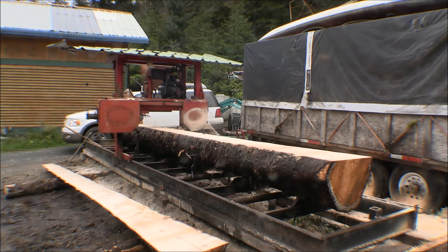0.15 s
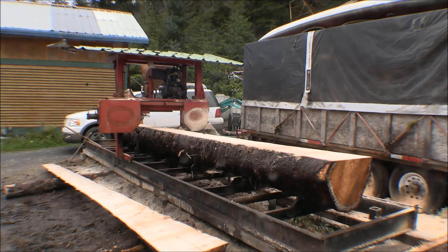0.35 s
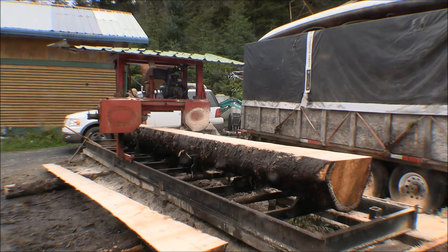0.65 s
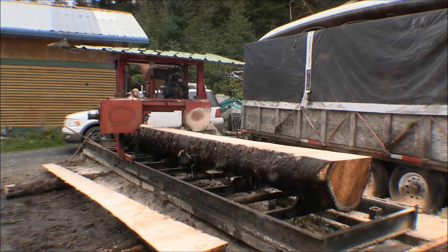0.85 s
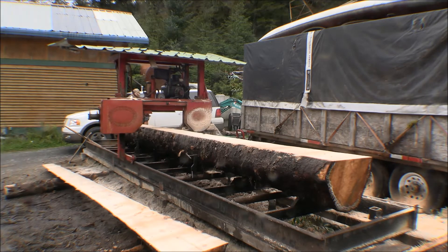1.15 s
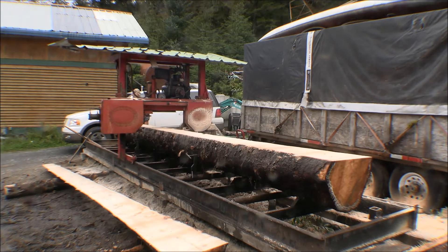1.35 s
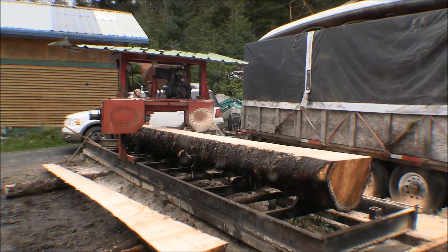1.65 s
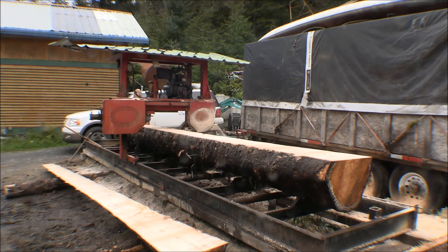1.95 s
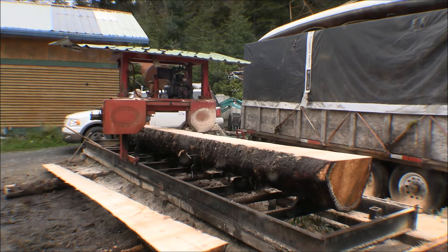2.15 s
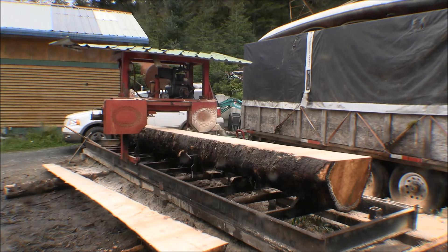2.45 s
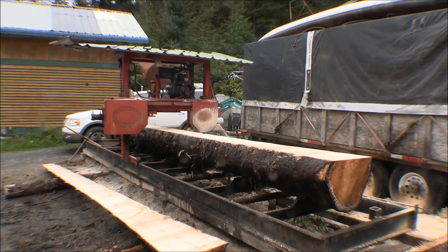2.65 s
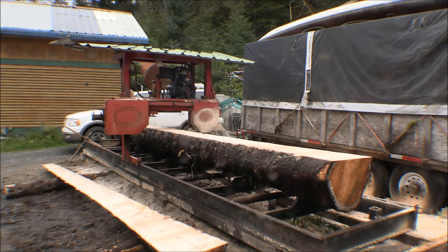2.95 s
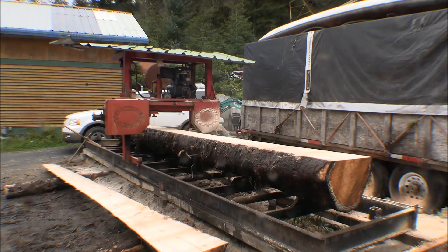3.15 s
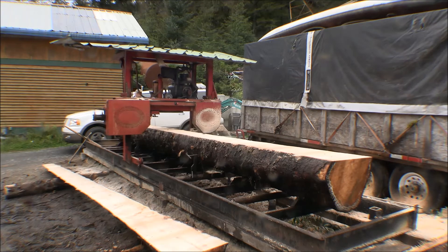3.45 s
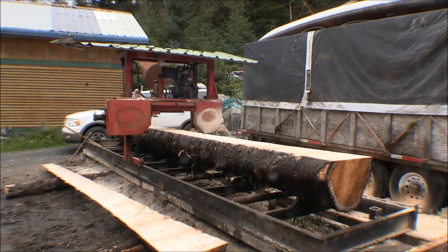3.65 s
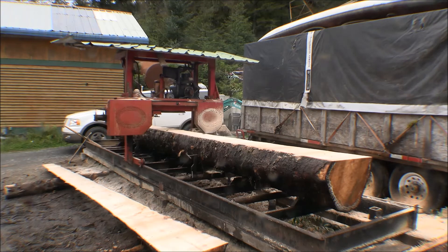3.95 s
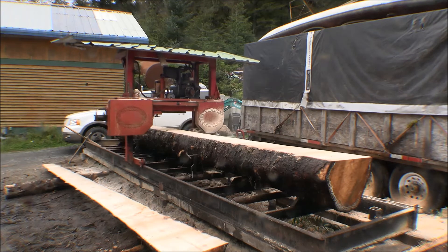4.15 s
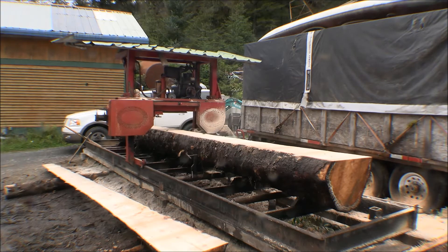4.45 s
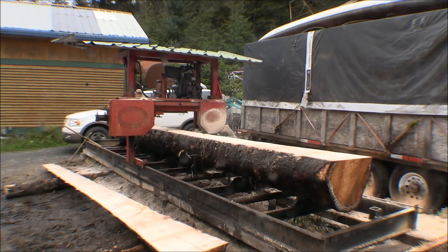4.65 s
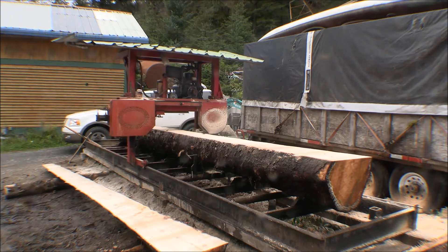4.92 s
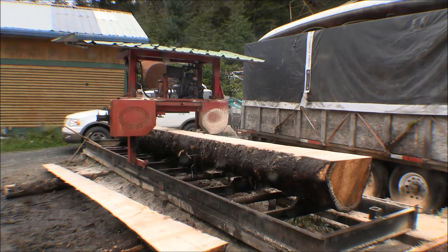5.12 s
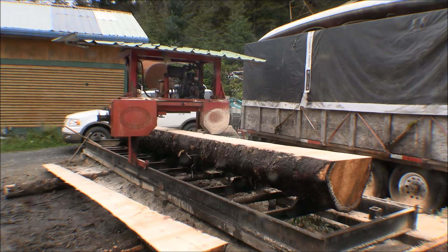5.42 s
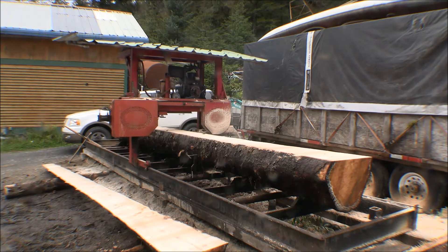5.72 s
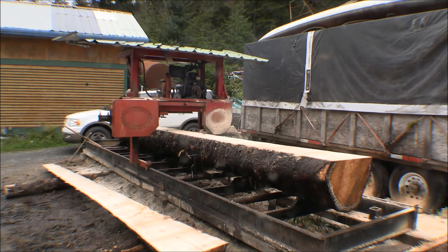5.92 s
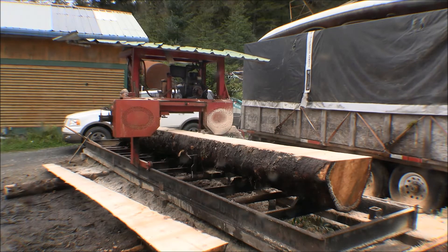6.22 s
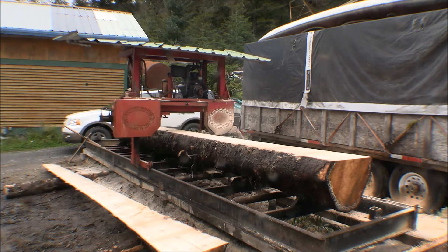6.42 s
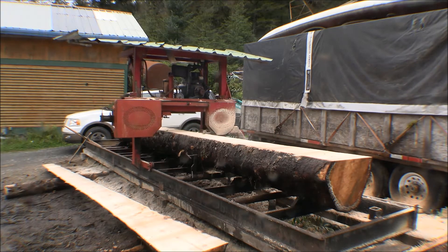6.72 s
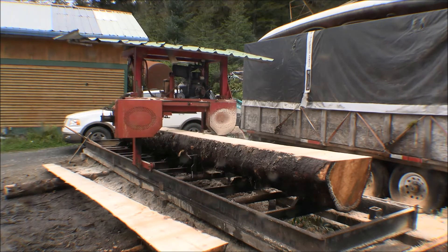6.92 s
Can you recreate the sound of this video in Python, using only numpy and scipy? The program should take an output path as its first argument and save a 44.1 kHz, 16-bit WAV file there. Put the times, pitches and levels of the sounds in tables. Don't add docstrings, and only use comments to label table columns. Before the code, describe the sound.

A portable band sawmill cuts lengthwise through a log in an open yard, already running at full load at 0 s and continuing unbroken to about 7 s. The engine holds a steady, buzzing drone, rich in harmonics, with tiny flutters and rapid stroke pulses. Over it lies a dense, bright roar and the sizzling hiss of the blade in wood, with metallic ringing from guards and blade. A sharp squeak comes at 0.06 s, a softer one at 0.2 s, then small chirps at 0.36 to 0.5 s. A faint fan tone sinks and vanishes by about 1.5 s. A thin roller whine near 2 kHz wavers throughout, dipping around 3 s and strengthening near 3.5 s. Faint chips occur around 3.8, 4.4, 5.5 and 6 s. The carriage creeps nearer, subtly changing tone and trailer echo; small stereo microphone, no ending.

```python
import sys
import numpy as np
from scipy import signal
from scipy.io import wavfile
from scipy.ndimage import uniform_filter1d

SR = 44100
rng = np.random.default_rng(int(sys.argv[2]) if len(sys.argv) > 2 else 0)


def volts_from_db(level):
    exponent = np.asarray(level, float) / 20
    return 10 ** exponent


def digitize_waveform(pressure):
    field = np.atleast_2d(pressure).T
    bounded = np.clip(field, -1, 1)
    quanta = np.round(bounded * 32767).astype(np.int16)
    wavfile.write(sys.argv[1], SR, quanta)


N = 312228
STEP = 200

# time in seconds, shaft speed in Hz.
SHAFT_SPEED = [(0, 107.65), (.45, 107.81), (1.2, 107.58), (1.65, 107.72), (2.0, 107.64), (2.5, 107.73),
               (2.97, 107.43), (3.5, 107.81), (3.85, 107.71), (4.25, 107.83), (4.7, 107.57), (5.05, 107.72),
               (5.55, 107.58), (6.0, 107.71), (7.08, 107.63)]
# multiple of shaft speed, rms level far in dB, rms level near in dB,
# echo share 0-1, moment in seconds when the echo adds fully.
LOW_ORDERS = [(2, -57.5, -57.3, 0, 0), (4, -40.7, -45.7, 0.15, 0.0), (5, -56.8, -62.3, 0.6, 6.9),
              (6, -37.0, -44.2, 0.45, 9.3), (7, -64.2, -60.3, 0.75, 6.7), (8, -52.1, -51.6, 0.75, 5.3),
              (9, -54.2, -46.7, 0.15, 1.0), (10, -44.9, -48.7, 0.45, 4.2), (11, -49.3, -44.9, 0.15, 2.2),
              (12, -44.1, -44.3, 0.3, 0.7), (13, -53.9, -55.2, 0, 0.0), (14, -37.2, -42.9, 0.3, 3.3),
              (15, -44.0, -54.4, 0.15, 2.5), (16, -42.8, -42.0, 0.15, 1.8), (17, -55.3, -56.1, 0.15, 1.7),
              (18, -36.8, -39.4, 0, 0.0), (19, -53.4, -56.4, 0.15, 0.2), (20, -55.4, -47.8, 0.45, 2.1),
              (21, -63.6, -55.8, 0.6, 1.3), (22, -64.2, -51.8, 0.15, 1.6)]
# multiple of shaft speed, rms level far in dB, rms level near in dB.
HIGH_ORDERS = [(23, -53.6, -55.7), (24, -50.8, -49.7), (25, -58.7, -45.2), (26, -46.7, -44.5),
               (27, -56.7, -47.4), (28, -39.5, -39.5), (29, -61.3, -56.2), (30, -43.5, -44.2),
               (31, -54.7, -56.4), (32, -51.4, -47.1), (33, -60.6, -56.0), (34, -50.1, -43.9),
               (35, -64.9, -58.6), (36, -60.9, -55.1), (37, -60.5, -56.0), (38, -54, -47.5),
               (39, -63.8, -52.1), (41, -62.6, -57.1), (42, -62.6, -53.0), (44, -67.4, -55.6),
               (46, -59.6, -54.8), (48, -56.2, -63.7), (49, -52, -52.5), (50, -62, -46), (52, -61.0, -59.1),
               (56, -56.8, -61.4), (57, -43.5, -58)]
SIDEWAYS_ORDERS = {4: -69, 6: -56}
# time in seconds, nearness (0 far, 1 near, may run
NOISE_NEARNESS = [(0, -0.78), (1.5, -0.93), (3, 0.1), (4.5, 1.04), (6, 1.3), (7.08, 1.38)]
# frequency in Hz, density in dB per Hz.
ROAR_FAR = [(30, -100.4), (100, -99.5), (170, -99.5), (260, -95), (370, -87.5), (480, -84), (600, -82),
            (720, -75.5), (900, -76.5), (1150, -71), (1500, -69), (1950, -68), (2400, -72), (3000, -67.5)]
# frequency in Hz, density in dB per Hz.
ROAR_NEAR = [(30, -100.1), (100, -99.2), (170, -100), (260, -98), (370, -85), (480, -83.5), (600, -81.5),
             (720, -80), (900, -76), (1150, -70), (1500, -68.5), (1950, -68), (2400, -71), (3000, -67.5)]
# frequency in Hz, density in dB per Hz.
HISS_FAR = [(3500, -69.5), (4000, -70.5), (4500, -72.5), (5200, -72.5), (5800, -71.5), (6500, -71.5),
            (7200, -71.5), (7800, -69), (8600, -72.5), (9600, -73.5), (11000, -76), (12500, -74),
            (14000, -78.5), (15700, -76.5)]
# frequency in Hz, density in dB per Hz.
HISS_NEAR = [(3500, -69), (4000, -70.5), (4500, -71.5), (5200, -71), (5800, -70.5), (6500, -71.5),
             (7200, -69.5), (7800, -69), (8600, -70.5), (9600, -72.5), (11000, -75), (12500, -74),
             (14000, -76.5), (15700, -76.5)]
# frequency in Hz, width in Hz, lift far
# in dB, lift near in dB.
NOISE_RINGS = [(1530, 90, 2, 1), (1800, 90, -1, 1), (3240, 120, 1, 2), (2720, 60, -3, -1),
               (735, 110, -6, -1), (4110, 70, 2, 2), (4280, 90, -3, -3), (4530, 70, 3, 4),
               (4680, 120, -2, -2), (5200, 200, 3, 2), (5050, 90, -2, -2), (5780, 150, -2, 0),
               (6620, 120, -2, -1), (5500, 90, -2, -3),
               (6135, 80, 3, 1), (6745, 60, 4, 2), (7640, 120, -1, 2), (8150, 140, 3, -1),
               (9350, 120, -2, -1), (9880, 140, 2, 1), (10400, 250, 2, -1), (11300, 200, 1, -2),
               (11750, 350, -2, 2), (12950, 150, 2, 0), (13600, 300, -1, -1.5), (14150, 250, 2, 2),
               (14880, 120, 2, 3)]
# frequency in Hz, share far 0-1, share near 0-1.
STROKE_SHARE = [(900, 0, .02), (2080, 0, 0.048), (3220, 0.54, 0.093), (4530, 0, 0.029), (7000, 0.25, 0.12),
                (8240, 0.48, 0.41), (14000, 0.4, 0.38)]
# frequency in Hz, rms level far in dB, near in dB.
BLADE_SINGING = [(4110, -52, -52), (6746, -48.5, -59), (4522, -57, -55)]
# time in seconds, frequency in Hz, rms level in dB.
ROLLER_WHINE = [(0, 2010, -44), (.7, 2027, -42), (2.6, 1986, -44.5), (2.97, 2006, -49), (3.55, 2018, -37),
                (4.4, 2028, -39), (4.8, 2014, -41), (7.08, 2013, -42)]
# frequency in Hz, rms level far in
# dB, rms level near in dB.
FAINT_HUMS = [(282, -74, -80), (323, -78, -69), (390, -72, -64), (468, -68, -65), (2205, -56, -56)]
# start in seconds, rms level in dB, start pitch in Hz,
# end pitch in Hz, length in seconds.
SQUEAKS = [
    (.062, -24, 1860, 1790, .025),
    (.206, -29, 1910, 1830, .026),
    (.362, -37, 2720, 2550, .02),
    (.378, -35.5, 2400, 1700, .04),
    (.503, -37, 2000, 1980, .02),
    (3.78, -37, 1790, 1790, .022),
    (4.36, -37, 1850, 1800, .022),
    (5.49, -37, 1800, 1800, .022),
    (5.98, -36, 1750, 1750, .022),
]
# frequency in Hz, side minus mid in dB.
STEREO_WIDTH = [(250, -50), (450, -6), (800, -34), (1800, -22), (2500, -23.5), (3100, -14.5), (6400, -10),
                (15000, -11.5)]
# frequency in Hz, left minus right in dB.
STEREO_LEAN = [(5000, 0), (8000, .6), (15000, .1)]


def read(points, hz, column=1):
    table = np.array(points, float)
    return np.interp(np.log(hz + 1), np.log(table[:, 0] + 1), table[:, column])


def curve(rows, column=1):
    table = np.array(rows, float)
    return np.interp(np.arange(0, N + STEP, STEP) / SR, table[:, 0], table[:, column])


def fine(control):
    return np.interp(np.arange(N) / STEP, np.arange(len(control)), control)


def drift(rate_hz):
    size = max(int(SR / STEP / 2 / rate_hz), 1)
    steps = uniform_filter1d(rng.standard_normal(N // STEP + 2), size)
    steps = uniform_filter1d(steps, size // 2 + 1)
    return steps / steps.std()


def stereo(x, hz, lead_db=0):
    half = np.array([[.5], [-.5]])
    return x * volts_from_db(half * (read(STEREO_LEAN, hz) + lead_db))


def shaft_turns():
    wheel_hz = 5.41
    tug_hz = np.linspace(.19, .07, N) * np.sin(2 * np.pi * wheel_hz * np.arange(N) / SR - 1.1)
    shaft_hz = fine(curve(SHAFT_SPEED) + 0.085 * drift(12.9))
    return np.cumsum(shaft_hz + tug_hz) / SR


def echoed(order, far_db, near_db, share=0, loudest_s=0):
    path_m_per_s, sound_m_per_s = .0541, 343
    t = np.arange(0, N + STEP, STEP) / SR
    slip_hz = order * SHAFT_SPEED[0][1] * path_m_per_s / sound_m_per_s
    echo = share * np.exp(2j * np.pi * slip_hz * (t - loudest_s))
    approach_db = far_db + (near_db - far_db) * t * SR / N
    return approach_db + 20 * np.log10(abs(1 + echo))


def drive(turns):
    casing_order, sideways_lag_turns = 15, .1
    out = np.zeros((2, N))
    for row in LOW_ORDERS + HIGH_ORDERS:
        order = row[0]
        level_db = echoed(*row) + 0.5 * (order > 23)
        if order > 23:
            spread = .25
        else:
            spread = 1 if order % 2 else .15
        lag_turns = .03 if order > casing_order else -.08
        start = rng.uniform(-np.pi, np.pi) * spread + 2 * np.pi * order * lag_turns
        flutter = min(order / 20, 1.3)
        flutter_db = flutter * (.7 * drift(1.5) + .8 * drift(16))
        size = fine(np.sqrt(2) * volts_from_db(level_db + flutter_db))
        phase = 2 * np.pi * order * turns + fine(start + .12 * flutter * drift(6))
        lead_db = .2 * flutter * rng.standard_normal()
        out += stereo(size * np.cos(phase), order * SHAFT_SPEED[0][1], lead_db)
        if order in SIDEWAYS_ORDERS:
            sideways = np.cos(phase - 2 * np.pi * sideways_lag_turns)
            out += np.sqrt(2) * volts_from_db(SIDEWAYS_ORDERS[order]) * sideways * [[1], [-1]]
    return out


def stroke_puffs(turns):
    stroke = np.floor(2 * turns).astype(int)
    chance_db = 1.16 * rng.standard_normal(2000)[stroke]
    puff = volts_from_db(-3.0 * (stroke % 2) + chance_db) * np.exp(-(2 * turns % 1) / 0.58)
    return puff / np.sqrt(np.mean(puff ** 2))


def noise_level(hz, nearness):
    far_db = read(ROAR_FAR + HISS_FAR, hz)
    near_db = read(ROAR_NEAR + HISS_NEAR, hz)
    for ring_hz, width_hz, far_lift_db, near_lift_db in NOISE_RINGS:
        shape = 1 / (1 + (2 * (hz - ring_hz) / width_hz) ** 2)
        far_db = far_db + far_lift_db * shape
        near_db = near_db + near_lift_db * shape
    patches = uniform_filter1d(rng.standard_normal((len(nearness), len(hz))), 5, 0)
    patches = uniform_filter1d(patches, 20, 1).T
    approach_db = far_db[:, None] + nearness * (near_db - far_db)[:, None]
    return volts_from_db(approach_db + 0.64 * patches / patches.std())


def wide_noise(level, hz):
    real, imag = rng.standard_normal((2, 2) + level.shape)
    mid, side = real + 1j * imag
    side = side * volts_from_db(read(STEREO_WIDTH, hz))[:, None]
    lean = volts_from_db(read(STEREO_LEAN, hz) / 2)[:, None]
    spectra = np.array([(mid + side) * lean, (mid - side) / lean]) * level
    return signal.istft(spectra, nperseg=2048, noverlap=1536)[1][:, :N]


def roar_and_hiss(turns, near):
    hop = 512
    hz = np.fft.rfftfreq(2048, 1 / SR)
    frame_at = np.arange(N // hop + 5) * hop
    nearness = np.interp(frame_at, np.arange(len(near)) * STEP, near)
    level = noise_level(hz, nearness)
    share_far = read(STROKE_SHARE, hz)[:, None]
    share_near = read(STROKE_SHARE, hz, column=2)[:, None]
    share = np.clip(share_far + nearness * (share_near - share_far), 0, 1)
    steady = wide_noise(level * np.sqrt(1 - share), hz)
    puffed = wide_noise(level * np.sqrt(share), hz) * stroke_puffs(turns)
    highpass = signal.butter(4, 900, "high", fs=SR, output="sos")
    sway_db = fine(0.14 * drift(6.6))
    return volts_from_db(16.5 + sway_db) * (steady + signal.sosfilt(highpass, puffed))


def tone(rows, waver_hz, flutter_db, pace_hz):
    hz = fine(curve(rows) + waver_hz * drift(pace_hz))
    size = fine(np.sqrt(2) * volts_from_db(curve(rows, column=2) + flutter_db * drift(12)))
    return stereo(size * np.sin(2 * np.pi * np.cumsum(hz) / SR), rows[0][1])


def held(hz, far_db, near_db):
    return [(0, hz, far_db), (N / SR, hz, near_db)]


def blade_singing():
    return sum(tone(held(*row), waver_hz=7, flutter_db=2, pace_hz=6) for row in BLADE_SINGING)


def roller_whine():
    return tone(ROLLER_WHINE, waver_hz=2.5, flutter_db=2.2, pace_hz=12)


def squeaks():
    out = np.zeros((2, N))
    for start_s, db, start_hz, end_hz, length_s in SQUEAKS:
        t = np.arange(int(length_s * SR)) / SR
        hz = start_hz + (end_hz - start_hz) * t / length_s
        phase = 2 * np.pi * np.cumsum(hz) / SR
        throb = 1 - 0.22 * np.cos(2 * np.pi * 105 * t + 1.4)
        body = np.sqrt(2) * volts_from_db(db) * throb * signal.windows.tukey(len(t), .4)
        at = round(start_s * SR)
        out[:, at:at + len(t)] += body * np.sin(phase + np.array([[.14], [-.14]]))
    return out


def fan_coast():
    start_hz, fall_hz_per_s = 592, 19
    start_db, fade_db_per_s = -49, 7
    coast_s = 1.3
    end_hz = start_hz - fall_hz_per_s * coast_s
    end_db = start_db - fade_db_per_s * coast_s
    rows = [(0, start_hz, start_db), (coast_s, end_hz, end_db), (coast_s + .3, end_hz, end_db - 30)]
    return tone(rows, waver_hz=.4, flutter_db=1.5, pace_hz=10)


def faint_hums():
    return sum(tone(held(*row), waver_hz=0.48, flutter_db=2.0, pace_hz=16) for row in FAINT_HUMS)


def scene():
    turns, near = shaft_turns(), curve(NOISE_NEARNESS)
    mill = drive(turns) + roar_and_hiss(turns, near)
    blade = blade_singing() + roller_whine()
    return mill + blade + squeaks() + fan_coast() + faint_hums()


def roll_off(x):
    return signal.sosfilt(signal.butter(12, 17090, fs=SR, output="sos"), x)


def record(dry):
    edge = signal.firwin(1023, 15730, window=("kaiser", 10), fs=SR)
    mix = signal.oaconvolve(dry, edge[None], "same", axes=1)
    return roll_off(mix)


dry = scene()
out = record(dry)
digitize_waveform(out)
```